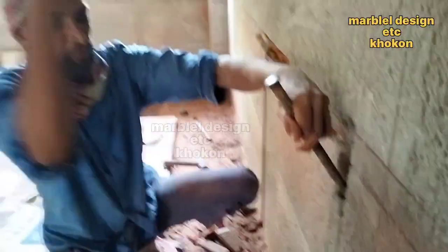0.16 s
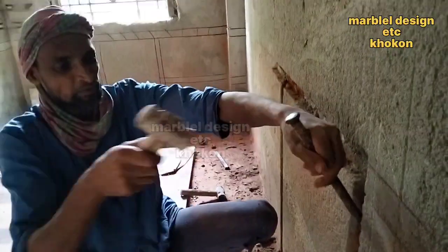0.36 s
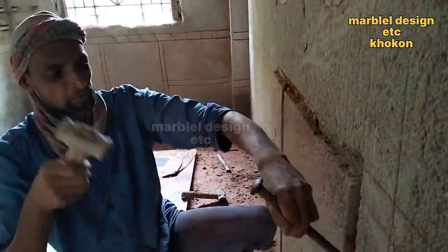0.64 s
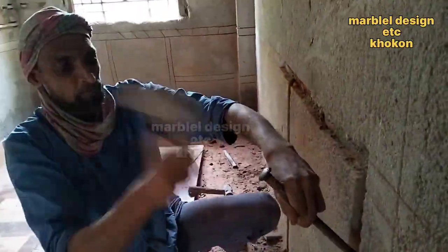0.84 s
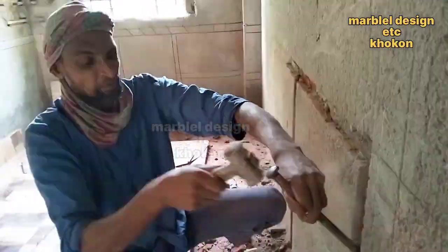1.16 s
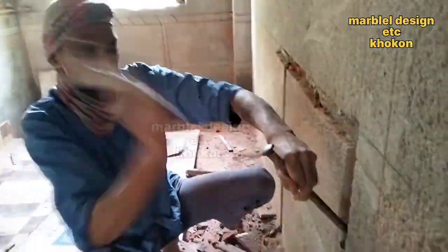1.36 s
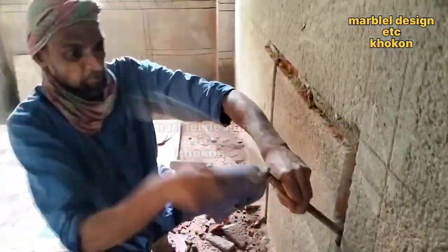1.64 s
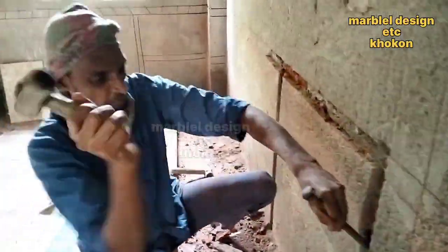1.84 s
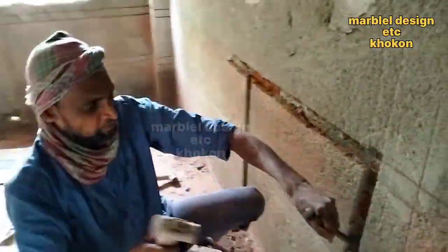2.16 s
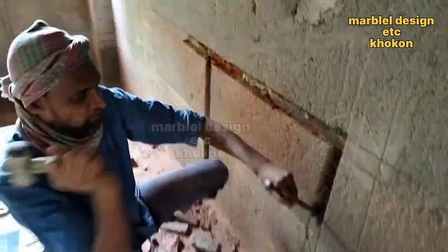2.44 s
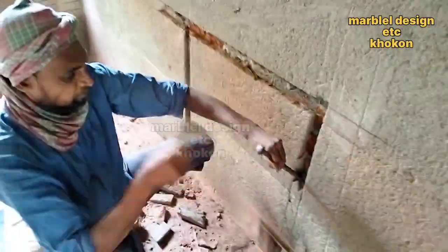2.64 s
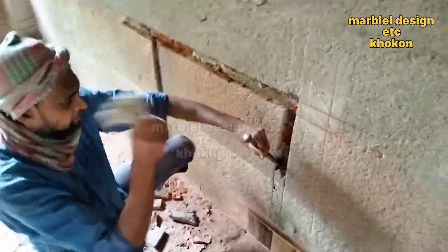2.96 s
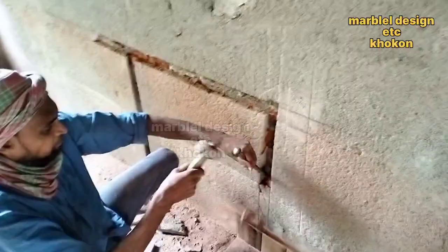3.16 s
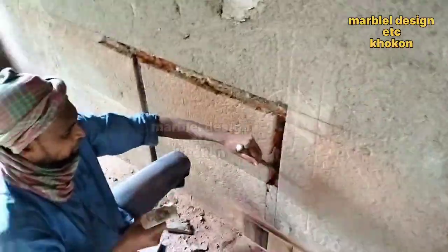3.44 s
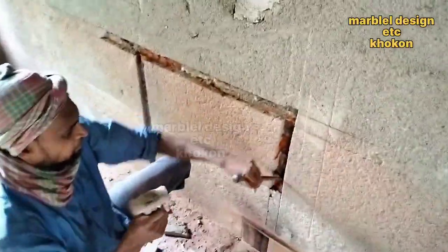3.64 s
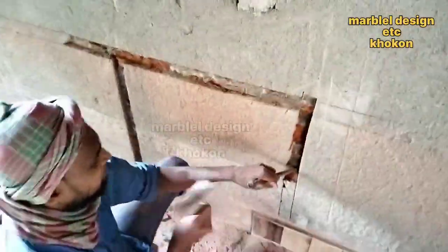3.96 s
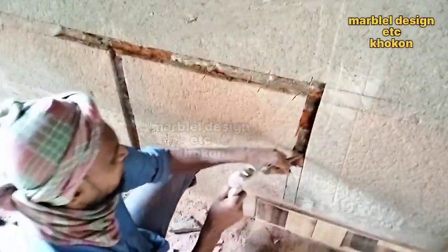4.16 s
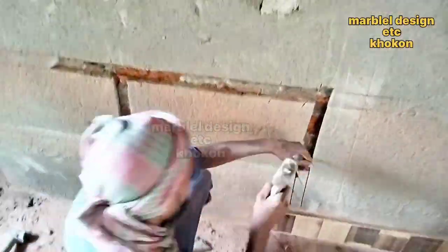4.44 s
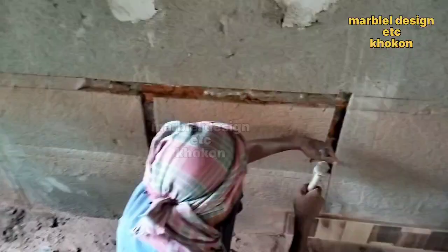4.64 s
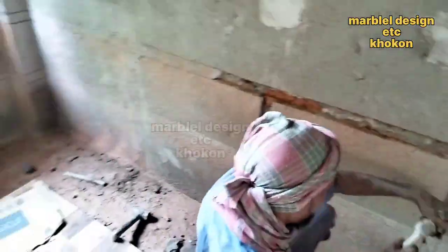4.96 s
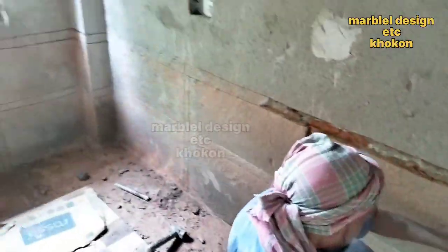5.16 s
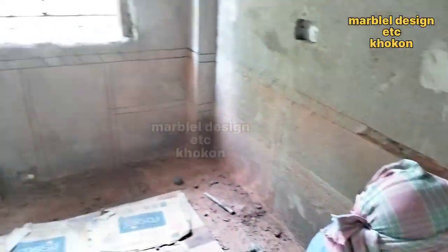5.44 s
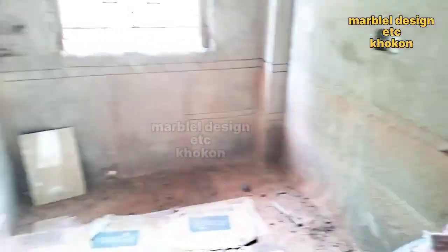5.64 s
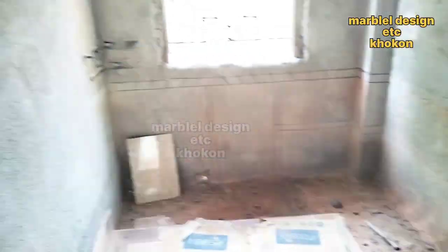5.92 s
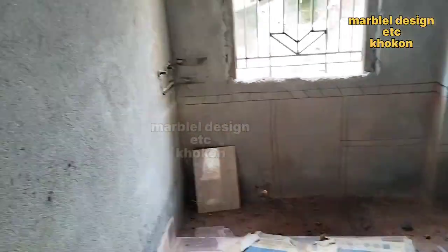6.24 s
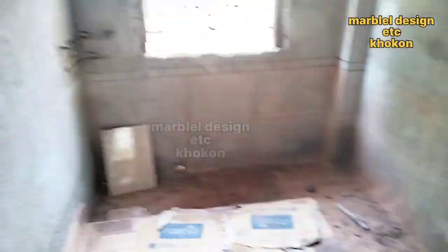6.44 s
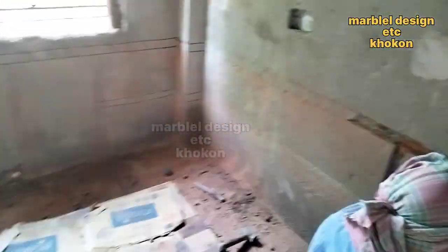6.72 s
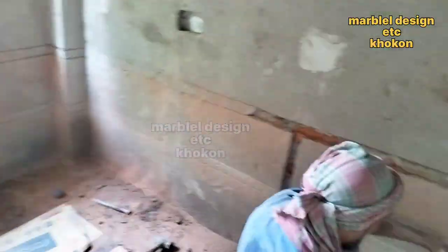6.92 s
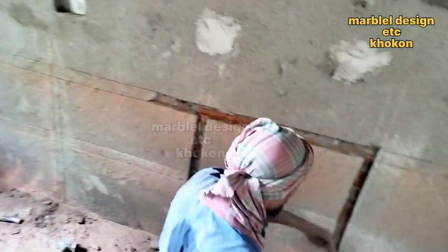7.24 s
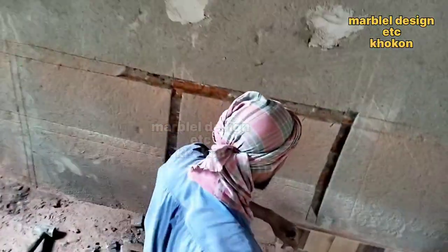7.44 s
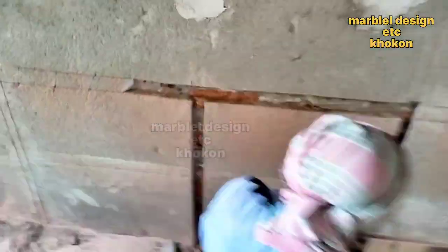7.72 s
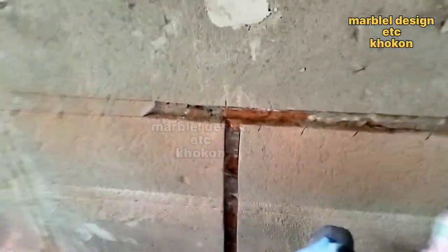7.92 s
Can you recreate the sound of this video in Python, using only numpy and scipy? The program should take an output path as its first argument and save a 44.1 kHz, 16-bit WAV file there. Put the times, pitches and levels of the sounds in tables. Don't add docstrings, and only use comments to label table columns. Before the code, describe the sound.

In a small bare room, a hammer knocks a steel chisel into plastered brick in steady runs, nearly four blows a second. Each blow crunches mortar, gives a short dull steel ring and thumps the wall with a boomy tail. Chips click down and sand trickles in the pauses. A close phone microphone, nearly mono, catches puffs of air from the early swings over a faint distant hum.

```python
import sys
import numpy as np
from scipy import signal
from scipy.fft import rfft, irfft
from scipy.io import wavfile
from scipy.ndimage import uniform_filter1d

SR = 44100
rng = np.random.default_rng(int(sys.argv[2]) if len(sys.argv) > 2 else 0)


def unload_wav(signal):
    wavfile.write(
        sys.argv[1],
        SR,
        np.round(np.clip(np.atleast_2d(signal).T, -1, 1) * 32767).astype(np.int16),
    )


def voltage_ratio(level):
    return 10 ** (np.asarray(level, float) / 20)


N = 356321
LEAD, SPAN = 4410, 30000


def evened(x):
    return x / np.sqrt(np.mean(x ** 2, -1, keepdims=True) + 1e-20)


def joules(x, energy_db):
    return voltage_ratio(energy_db) * x * np.sqrt(SR / np.sum(x ** 2, -1, keepdims=True))


def read(points, hz):
    f, value = np.transpose(points)
    return np.interp(np.log(hz + 1), np.log(f + 1), value)


def coloured(x, db_of_hz):
    gain = voltage_ratio(db_of_hz(np.fft.rfftfreq(x.shape[-1], 1 / SR)))
    return irfft(rfft(x) * gain, x.shape[-1])


def add(mix, start_s, sound):
    part = mix[round(start_s * SR) + LEAD:][:len(sound)]
    part += sound[:len(part)]


def struck(modes, count, spread_db, flutter_hz):
    hz, db, t60 = np.transpose(modes)[:, None, :, None]
    t = np.arange(int(min(t60.max() * SR, SPAN))) / SR
    luck = rng.standard_normal((count, len(modes), 2, 65))
    knot = np.minimum(t * flutter_hz, 62)
    k = knot.astype(int)
    wander = luck[..., k] * (1 - knot + k) + luck[..., k + 1] * (knot - k)
    sine, cosine = np.moveaxis(wander, 2, 0)
    phase = 2 * np.pi * hz * t
    decay = voltage_ratio(db + spread_db * luck[:, :, 0, -1:] - 60 * t / t60)
    ring = decay * ((0.13 + sine) * np.sin(phase) + cosine * np.cos(phase))
    ring *= 1 - np.exp(-t * hz)
    return ring.sum(1) / np.linalg.norm(voltage_ratio(db)) / 1.6


def bite(rise_ms, hold_ms, grain_db, size):
    t_ms = np.arange(size) / SR * 1000
    grains = rng.standard_normal((len(rise_ms), 2, size))
    force = grains[:, 0] * voltage_ratio(grain_db * evened(uniform_filter1d(grains[:, 1], 30)))
    return evened(force) * (1 - np.exp(-(t_ms / rise_ms) ** 2)) * np.exp(-t_ms / hold_ms)


# pitch_hz, t60_s
NEAR_T60 = [(60, 0.76), (160, 0.86), (420, 0.64), (1100, 0.23), (2900, 0.17), (7700, 0.13), (14000, 0.03)]
# pitch_hz, t60_s
FAR_T60 = [(60, 0.92), (400, .85), (1500, 0.64), (5000, 0.26), (8000, 0.35), (10000, .2), (13000, .15)]


def room(x, near_db, far_db, size=SPAN):
    hz, t, air = signal.stft(rng.standard_normal((len(x), size)), SR, nperseg=256)
    padded = np.pad(x, ((0, 0), (0, size)))[:, :size]
    power = abs(signal.stft(padded, SR, nperseg=256)[2]) ** 2
    near_t60, far_t60 = (read(table, hz)[:, None] for table in (NEAR_T60, FAR_T60))
    near = voltage_ratio(-120 * t / near_t60) / near_t60
    far = voltage_ratio(-120 * t / far_t60) / far_t60
    echo = (voltage_ratio(2 * near_db) * near + voltage_ratio(2 * far_db) * far) * (t > 0) * t[1] * 6 * np.log(10)
    spread = abs(signal.fftconvolve(power, echo[None], axes=2)[..., :len(t)])
    noise = air * np.sqrt(spread / np.mean(abs(air) ** 2))
    tail = signal.istft(noise, SR, nperseg=256)[1][:, :size]
    tail = signal.lfilter(*signal.butter(2, 130., "high", fs=SR), tail)
    tail[:, :x.shape[1]] += x[:, :size]
    return tail


# pitch_hz, level_db (per Hz)
HUM = [(15, -36), (25, 0.5), (301, -7), (504, -15), (571, -19), (1770, -34), (2690, -26.5), (3800, -36.5),
       (5780, -31.5), (9000, -50.5), (11700, -81), (19800, -120)]


def hum():
    frames, hz = N // 256 + 5, np.fft.rfftfreq(1024, 1 / SR)
    a, b, patches = rng.standard_normal((frames, 513, 3)).T
    patches = evened(uniform_filter1d(uniform_filter1d(patches, 12, 0), 14, 1))
    z = (a + 1j * b) * voltage_ratio(read(HUM, hz)[:, None] + 2.9 * patches)
    return voltage_ratio(-60) * evened(signal.istft(z, nperseg=1024, noverlap=768)[1][:N])


# pitch_hz, level_db (per Hz)
GRIT = [(100, -20), (400, 3), (1200, 8), (3000, 3.5), (6000, 1), (7500, -10), (9500, -25), (12500, -14),
        (15500, -19), (16100, -40.5)]
# time_s, level_db
SWEEP = [(5.9, -106), (6.02, -68.5), (6.45, -65), (6.66, -68), (7.07, -77), (7.16, -60.5), (7.83, -60.5),
         (8.08, -60)]


def trickle():
    sand_db, peak_s, spread_s, clump_db = -61, 0.15, 0.1, 2.5
    grains = rng.standard_normal((2, N))
    clumps = voltage_ratio(clump_db * evened(uniform_filter1d(grains[1], 200)))
    sand = coloured(grains[0] * clumps, lambda hz: read(GRIT, hz) - 12.0 * (hz > 8000))
    t = np.arange(0, N + 256, 256) / SR
    blow_s = np.transpose(BLOWS)[0][:, None]
    pours = np.exp(-((t - blow_s - peak_s) / spread_s) ** 2).max(0)
    level = voltage_ratio(sand_db) * pours + voltage_ratio(np.interp(t, *np.transpose(SWEEP)))
    return voltage_ratio(-3.5) * np.interp(np.arange(N) / SR, t, level) * evened(sand)


def debris(start_s, level_db, centre_hz, spill_ms, grain_db, focus_db):
    spill_ms = np.clip(spill_ms, 1, 60)
    force = bite(.5 * spill_ms, spill_ms, grain_db, size=8192)

    def colour(hz):
        octaves = np.log2((hz + 1) / centre_hz)
        return read(GRIT, hz) - np.minimum(44.0 * octaves ** 2, abs(focus_db))

    grit = coloured(force, colour) * np.linspace(1, 0, 8192)
    grit /= abs(grit).max(1, keepdims=True)
    return zip(start_s[:, 0], voltage_ratio(level_db - 2.5) * room(grit, -0.5, -19.5, size=16000))


# start_s, level_db, centre_hz, length_ms
SPILLS = [(0.819, -32.5, 5200, 22), (1.0475, -46, 2460, 59), (1.283, -52.5, 2540, 22),
          (1.5474, -45, 1240, 40), (1.8534, -31.5, 1230, 17), (2.0292, -25, 2260, 20.3),
          (2.151, -48, 2980, 13), (3.245, -34, 3000, 20), (7.396, -29.5, 3000, 17),
          (7.16, -21.5, 3000, 8.4), (4.2688, -50, 1770, 31), (4.802, -34.5, 2545, 21),
          (4.8249, -28.5, 2660, 74), (6.103, -32.5, 2630, 44), (6.1385, -30.5, 1600, 11),
          (6.42, -37, 2780, 5.7), (6.5072, -41.5, 2640, 38), (6.5594, -39.5, 4130, 13),
          (6.638, -39, 5150, 26), (6.6692, -36.5, 1480, 19), (7.2533, -31.5, 1220, 5.9),
          (7.574, -39, 1180, 6.1), (7.6445, -41, 1990, 22), (7.7697, -48, 1266, 25), (7.958, -42, 2590, 17),
          (7.9987, -28.5, 2840, 18.7), (8.0474, -31, 3110, 18)]


def spills():
    return debris(*np.transpose(SPILLS)[:, :, None], grain_db=3, focus_db=8.5)


# start_s, level_db, centre_hz, focus_db (how far the pitch stands out)
CHIPS = [(0.38, -10, 3530, 17.5), (0.391, -10, 3800, 15), (0.4544, -28, 4500, -1),
         (0.5154, -30.5, 1570, 20.5), (1.1994, -25.5, 1257, 0.5), (2.0537, -18, 2550, 17.5),
         (2.0994, -27.5, 3080, 11), (2.2394, -48, 2650, 4), (2.2694, -59.5, 2580, 9),
         (2.9961, -29.5, 2114, 18.5), (3.2156, -20, 2440, 9), (3.228, -23, 3040, 7.5),
         (3.3493, -44, 2730, 20), (3.7229, -53, 4550, 7), (5.0604, -37, 2560, 6.5),
         (7.1706, -15.5, 2310, 16), (7.4066, -23, 2690, 11), (7.4525, -36, 5730, 3),
         (7.6755, -29.5, 2720, 12), (8.0007, -20.5, 2980, 14), (8.0294, -27, 3500, 8),
         (3.781, -47.5, 3600, 5.5), (3.54, -43.5, 1213, 8), (0.507, -30.5, 1300, 19)]


def chips():
    start_s, level_db, centre_hz, focus_db = np.transpose(CHIPS)[:, :, None]
    return debris(start_s, level_db, centre_hz, 3.7 + 0 * start_s, 4.5, focus_db)


# start_s, level_db (the chisel's lowest mode),
# then relative to it chisel_second_db, hammer_low_db, hammer_high_db
TOUCHES = [(0.5293, -53, 1.5, -12, -25.5), (0.6, -71, -15, 5, -8), (2.142, -63.5, -7, -14, -22.5),
           (3.268, -74, -14, -10, 16), (3.3504, -67.5, -24, -26, -25), (3.4288, -67.5, 2, -15, -21),
           (5.1187, -64, -1, -9, -20.5), (6.4223, -48.5, -6, -21, -25.5), (6.5043, -56, -7, -6, -20),
           (7.2582, -59.5, -13, 5, -3), (7.398, -60, -25, 15, 10), (7.45, -65.5, -25, 6, 14)]
# pitch_hz, level_db, t60_s
TOUCH = [
    [(2650, 0, .09)],
    [(3000, 0, .1)],
    [(5100, 0, .08)],
    [(5720, 0, .09)],
    [(7800, 0, .07), (9720, -6, .07), (11050, -3, .07), (11800, -5, .07)],
]


def touches():
    start_s, level_db, second_db, low_db, high_db = np.transpose(TOUCHES)[:, :, None]
    force = bite(2 + 0 * start_s, 27.0, 3.0, size=4096)
    force /= np.linalg.norm(force, axis=1, keepdims=True)
    count = len(start_s)
    steel = 0
    for modes, mode_db in zip(TOUCH, (0, low_db, second_db, high_db, -17.5)):
        steel = steel + voltage_ratio(mode_db) * struck(modes, count, 0.59, 55.)[:, :2800]
    sound = room(signal.fftconvolve(force, steel, axes=1), -12.0, -22.0, size=20000)
    thump = struck(WALL + BOOM[:2], count, 1, 60.)[:, :14000] * np.linspace(1, 0, 14000)
    sound[:, :thump.shape[1]] += voltage_ratio(4.5) * thump
    knock = struck(BRICK + STEEL[4][:2], count, 1, 130.)
    sound[:, :knock.shape[1]] += voltage_ratio(-4.5) * knock
    return zip(start_s[:, 0], voltage_ratio(level_db + 14.0) * sound)


# start_s (the edge bites), crush_db (energy), rise_ms (build-up),
# wall_db (thump into the wall), steel_db (ring of the steel)
BLOWS = [(-0.05, -40.5, 19, -42, -44), (0.2056, -39, 2.5, -41.5, -32.5), (0.8427, -42, 6.1, -34.5, -31.5),
         (1.098, -39, 10.6, -39, -29.5), (1.3604, -38, 0.36, -37.5, -33), (1.6234, -38, 1.2, -35, -54.5),
         (1.9083, -41, 6.4, -40.5, -34.5), (2.5263, -37, 12, -35.5, -29.5),
         (2.7881, -36, 5.1, -35.5, -29.5), (3.0598, -38, 13, -37.5, -37.5), (3.8185, -37, 0.29, -32.5, -35),
         (4.0642, -39.5, 13, -35.5, -34.5), (4.3114, -36.5, 3.7, -34.5, -37.5),
         (4.5764, -38.5, 9.9, -42.5, -29.5), (4.8531, -40, 7.8, -46.5, -28), (5.379, -37, 2.2, -33.5, -44),
         (5.6522, -35.5, 2.4, -34, -35), (5.9252, -37, 3, -37, -36.5), (6.786, -34.5, 3, -34.5, -37),
         (7.0524, -36, 7.9, -36, -32.5)]
# time_s, air_db (swing), behind (0-1), hollow_db (brick under the edge)
STANCE = [(-0.05, -57, 0, -6.5), (0.2, -38, 0.14, 1), (0.85, -44, 0.49, -3), (1.1, -47.5, 0, 2.5),
          (1.36, -35, 0, -0.5), (1.62, -29.5, 0.15, 0.5), (1.901, -43, 0.2, 1.5), (2.53, -38, 1.05, 0),
          (2.79, -34.5, 0.4, -3), (3.059, -45, 1.08, 2.5), (3.82, -54, 1.1, -13),
          (4.061, -43.5, 0.99, -0.5), (4.3, -56, 0.7, 1.5), (4.859, -68.5, 0.8, -6.5),
          (5.38, -70, 0.93, -3.5), (5.93, -62, 0.94, 3), (6.79, -69, 0.74, 8.5), (7.05, -76, 0.94, 4)]
# pitch_hz, level_db (per Hz)
CRUSH = [(300, -8), (900, -11), (2000, -3.5), (3600, -0.5), (6000, -3), (7200, -13.5), (8250, -11),
         (9000, -24.5), (10600, -25.5), (12600, -18), (14000, -21), (15600, -26), (16100, -42)]
# pitch_hz, level_db, t60_s
STEEL = [
    [(2606, 0, .06), (2990, -2, .03), (2250, -4, .03), (2750, -3, .01)],
    [(5110, -2, .04), (5390, -1, .03), (5580, 0, .03), (4290, -3, .02), (6230, -3, .015), (4700, -3, .012)],
    [(9720, 0, .075), (9850, -5, .03)],
    [(11790, 0, .035), (12050, -3, .015), (13150, -8, .015)],
    [(1000, -2, .02), (1200, 0, .025), (1500, -2, .015), (1735, -1, .02)],
]
# energy_db, ring_share (of the blow's ring), behind_db (gained behind the worker)
STEEL_LAW = [
    (-39.5, .4, 5.5),
    (-32.5, 0.82, -1.5),
    (-62.5, -0.7, 19),
    (-50.5, -0.11, 5.5),
    (-43, -0.29, 4.5),
]
# pitch_hz, level_db, t60_s
WALL = [(241.8, -1.5, 0.59), (314, -1.5, 0.58), (365.5, -3.5, 0.59), (437, -4.5, 0.48), (354, -8, 0.059)]
# pitch_hz, level_db, t60_s
BRICK = [(532, 0, 0.33), (626, -3, 0.37), (728.5, -1.5, 0.24), (858, -5, 0.24)]
# pitch_hz, level_db, t60_s
BOOM = [(104.8, -6, 0.93), (125.05, -0.5, 0.45), (78.7, -14.5, 0.5), (146, -7.5, 0.71), (198, -6.5, 0.65),
        (48, -16.5, 0.56)]
BLUR_HZ = 52, 130, 45


def blows():
    start_s, crush_db, rise_ms, wall_db, steel_db = np.transpose(BLOWS)[:, :, None]
    when, *stance = np.transpose(STANCE)
    air_db, behind, hollow_db = (np.interp(start_s, when, curve) for curve in stance)
    count = len(start_s)

    hold_ms = np.maximum(19.5 - 7.5 * behind - 0.55 * rise_ms, 3)
    force = bite(np.clip(rise_ms, .3, 30), hold_ms, 6.7, size=6144)
    t_ms = np.arange(6144) / SR * 1000
    force = force * np.exp(np.minimum(t_ms, rise_ms) / hold_ms)
    crush = coloured(force, lambda hz: read(CRUSH, hz)) * np.linspace(1, 0, 6144)
    sound = np.zeros((count, SPAN))
    sound[:, :6144] = joules(crush, crush_db + 3.5)

    extra_ring_db = steel_db + 34
    for modes, (usual_db, share, behind_db) in zip(STEEL, STEEL_LAW):
        ring = signal.fftconvolve(force, struck(modes, count, 0.83, 140.0), axes=1)
        ring_db = usual_db + share * extra_ring_db + behind_db * behind - 5.5
        sound[:, :ring.shape[1]] += joules(ring, ring_db)
    sound[:, :ring.shape[1]] += joules(ring, STEEL_LAW[-1][0] + hollow_db - 12.5)
    sound = room(sound, -0.068, -17.5)

    brick_db = wall_db - 6.5 + hollow_db
    boom_db = wall_db + 4 - 11.5 * behind
    for modes, low_db, flutter_hz in zip((WALL, BRICK, BOOM), (wall_db, brick_db, boom_db), BLUR_HZ):
        low = struck(modes, count, 1.1, flutter_hz)
        t = np.arange(low.shape[1]) / SR
        swell = 1 - np.exp(-(t / (0.0014 + rise_ms / 1000)) ** 2)
        sound[:, :low.shape[1]] += joules(low * swell, low_db)

    u = np.arange(6000) / SR / 0.0072
    sound[:, :6000] += joules(u * np.exp(-u) * -np.cos(2.0 * u), air_db)
    return zip(start_s[:, 0], sound)


def scene():
    mix = np.zeros(N + LEAD)
    for source in (spills, chips, touches, blows):
        for start_s, sound in source():
            add(mix, start_s, sound)
    return np.tile(mix[LEAD:] + hum() + trickle(), (2, 1))


def band_limit(x):
    return signal.sosfilt(signal.butter(12, 16480, fs=SR, output="sos"), x)


def record(dry):
    mid = 1.25 * np.tanh(dry[0] / 1.2)
    smear_db, smear_ms = -31.5, 6.3
    smear = rng.standard_normal(1000) * np.exp(-np.arange(1000) / (smear_ms * SR / 1000))
    smear /= np.linalg.norm(smear)
    backwards = np.diff(mid, prepend=0)[::-1]
    mid = mid + voltage_ratio(smear_db) * signal.oaconvolve(backwards, smear)[:N][::-1]
    mid = signal.oaconvolve(mid, signal.firwin(255, 16300, fs=SR), "same")
    hz, t, z = signal.stft(mid, SR, nperseg=512)
    luck = rng.random((len(t) // 6 + 1, 18)).repeat(6, 0)[:len(t)]
    luck = luck.T[np.arange(len(hz)) // 15]
    chance = read([(4200, 0), (4400, .03), (8000, .04), (11000, .12), (15000, .2)], hz)[:, None]
    noise = (luck < chance) * abs(z) * np.exp(2j * np.pi * rng.random(z.shape))
    side = voltage_ratio(-2.0) * signal.istft(noise, SR, nperseg=512)[1][:N]
    return band_limit(np.array([mid + side, mid - side]))


dry = scene()
out = record(dry)
unload_wav(out)
```